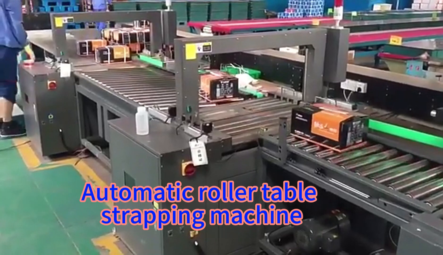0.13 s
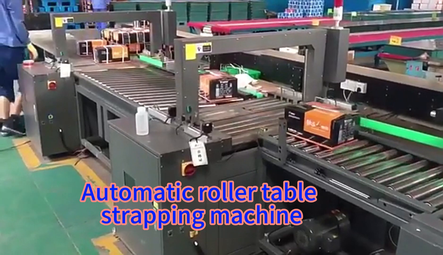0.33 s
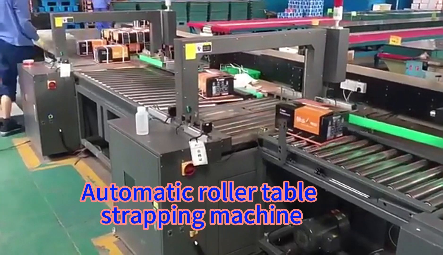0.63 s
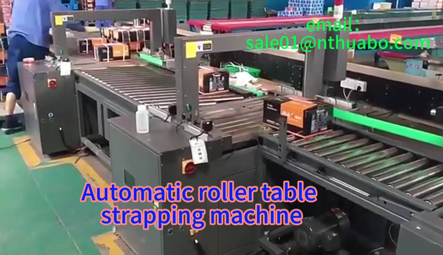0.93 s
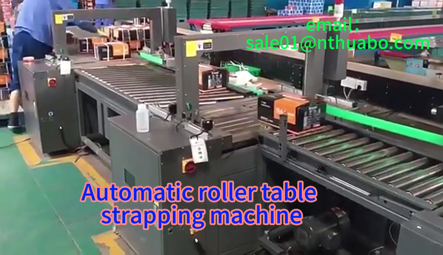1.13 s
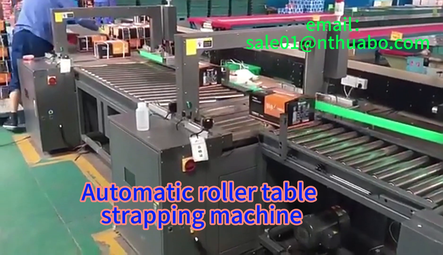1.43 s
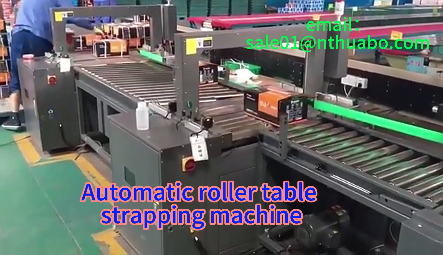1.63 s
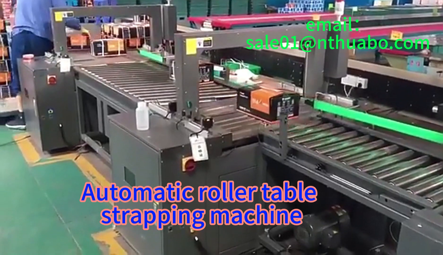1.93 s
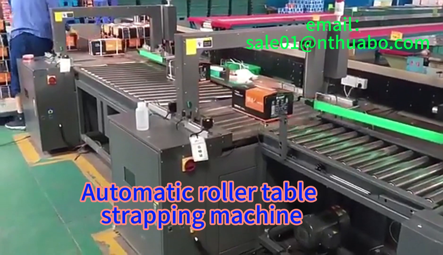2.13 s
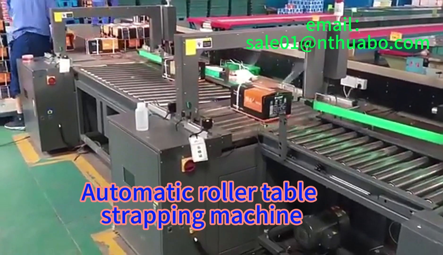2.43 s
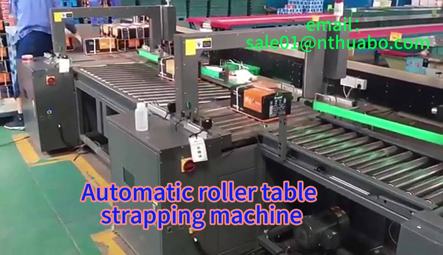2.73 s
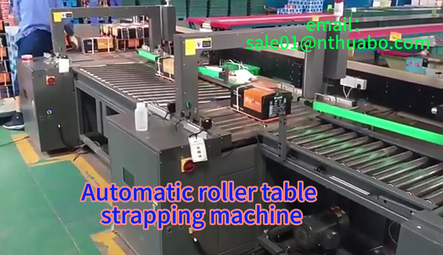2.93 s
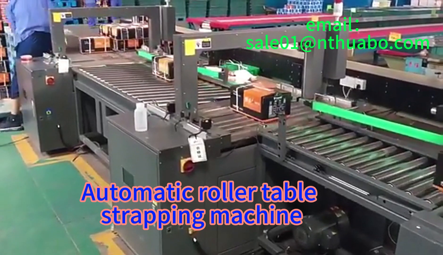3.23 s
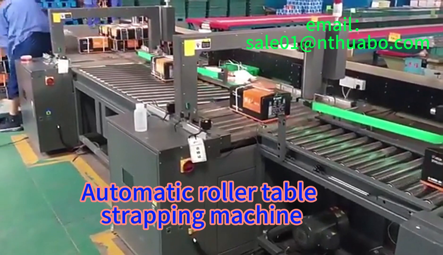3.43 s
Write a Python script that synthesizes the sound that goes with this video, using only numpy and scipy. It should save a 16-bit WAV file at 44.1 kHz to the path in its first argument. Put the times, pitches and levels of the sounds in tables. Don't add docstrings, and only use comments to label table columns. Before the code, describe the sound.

Strapping machine and roller conveyor clanking with hard metal blows over a steady factory roar

```python
import sys
import numpy as np
from scipy import signal
from scipy.fft import rfft, irfft
from scipy.io import wavfile
from scipy.ndimage import uniform_filter1d

SR = 44100
rng = np.random.default_rng(int(sys.argv[2]) if len(sys.argv) > 2 else 0)


def dump_mix(stems):
    frames = np.atleast_2d(stems).T
    limited = np.clip(frames, -1, 1)
    pcm = np.round(limited * 32767).astype(np.int16)
    wavfile.write(sys.argv[1], SR, pcm)


def gain_from_db(level_db):
    decades = np.asarray(level_db, float) / 20
    return 10 ** decades


N = 158319

# time_s, level_db
ROLLER_EFFORT = [(0.0, -33), (0.491, -31.5), (0.581, -33.5), (0.712, -40.5), (1.08, -42.5), (1.2, -53.5),
                 (1.42, -42), (1.82, -48), (2.051, -46.5), (2.18, -35.5), (2.262, -42), (2.42, -40.5),
                 (2.6, -44), (3.28, -45.5), (3.439, -42.5), (3.59, -33.5)]
# frequency_hz, level_db (per Hz)
BLOW_SPECTRUM = [(88, -34), (150, -9.5), (333, 0), (617, -1.5), (1830, -1.5), (2990, -2.5), (3870, -3),
                 (7300, -15), (9490, -48), (16100, -120)]


def evened(x):
    return x / np.sqrt(np.mean(x ** 2) + 1e-20)


def read(points, hz):
    f, value = np.transpose(points)
    return np.interp(np.log(np.minimum(hz, 7000) + 1), np.log(f + 1), value)


def colour(x, points):
    gain = gain_from_db(read(points, np.fft.rfftfreq(len(x), 1 / SR)))
    return evened(irfft(rfft(x) * gain, len(x)))


def track(points):
    s, level_db = np.transpose(points)
    return np.interp(np.arange(N) / SR, s, level_db)


def add(mix, s, sound):
    at = max(round(s * SR), 0)
    part = mix[at:at + len(sound)]
    part += sound[:len(part)]


def resonate(x, hz, width):
    turn = np.exp(2j * np.pi * np.cumsum(hz * np.ones(len(x))) / SR)
    r = np.exp(-np.pi * abs(width) / SR)
    slow = signal.lfilter([1 - r], [1, -r], x / turn + 1e-18)
    return evened((turn * slow).real)


def stroke(t, rise, hold, t60):
    attack = np.sin(np.pi / 2 * np.clip(t / rise, 0, 1)) ** 2
    return attack * gain_from_db(-60 * np.maximum(t - rise - hold, 0) / t60)


def patchy(x, depth_db):
    z = signal.stft(x, nperseg=512, noverlap=384)[2]
    patches = rng.standard_normal(z.shape[::-1]).T
    patches = evened(uniform_filter1d(uniform_filter1d(patches, size=5, axis=0), size=12, axis=1))
    return signal.istft(z * gain_from_db(depth_db * patches), nperseg=512, noverlap=384)[1][:len(x)]


def hall():
    # frequency_hz, level_db (per Hz)
    roar = [(26, -37), (45, -0.5), (151, 1), (242, -8.5), (326, -10), (966, -17), (2220, -24.5),
            (5900, -28.5), (7300, -38.5), (9490, -64), (16100, -120)]
    frames, hz = N // 256 + 5, np.fft.rfftfreq(1024, 1 / SR)
    a, b, patches = rng.standard_normal((frames, 513, 3)).T
    flicker = evened(uniform_filter1d(rng.standard_normal(frames), size=6))
    patches = evened(uniform_filter1d(uniform_filter1d(patches, size=10, axis=0), size=10, axis=1))
    drift_db = 3.8 * np.minimum(hz / 1500, 1)[:, None] * patches + .5 * flicker
    z = (a + 1j * b) * gain_from_db(read(roar, hz)[:, None] + drift_db)
    s, level_db = np.transpose(ROLLER_EFFORT)
    effort_db = np.interp(np.arange(frames) * 256 / SR, s, level_db) + 40.5
    z = z * gain_from_db(.25 * np.minimum(hz / 4000, 1)[:, None] ** 2 * effort_db)
    return gain_from_db(-31) * evened(signal.istft(z, nperseg=1024, noverlap=768)[1][:N])


def table():
    # time_s, level_db
    load = [(0.0, -33), (0.56, -41.5), (0.86, -32), (1.13, -35.5), (1.26, -39), (1.52, -36.5),
            (2.19, -33.5), (2.56, -40.5), (3.32, -35), (3.47, -36), (3.59, -32)]
    # frequency_hz, width_hz, level_db
    panels = [(227, 70, -4), (315, 45, 2), (386, 120, -4)]
    noise = rng.standard_normal(N)
    drone = sum(gain_from_db(db) * resonate(noise, hz, w) for hz, w, db in panels)
    return gain_from_db(track(load) - 3) * evened(drone)


def rollers():
    # frequency_hz, level_db (per Hz)
    rattle = [(120, -39), (200, -17), (360, 6.5), (465, -5.5), (1030, 9), (1240, 4.5), (1880, 6.5),
              (7300, -6.5), (9490, -45), (16100, -120)]
    # frequency_hz, width_hz, level_db
    tubes = [(1122, 15, -12.5), (1880, 55, -1.5), (3240, 93, -6), (5850, 120, -17), (6444, 180, -1),
             (7000, 220, 0)]
    ticks_per_s, spread_db = 2300, 2.5
    ticks = gain_from_db(spread_db * np.minimum(rng.exponential(1, N), 4)) * (rng.random(N) < ticks_per_s / SR)
    hiss = rng.standard_normal(N)
    drive = 0.68 * evened(ticks * rng.choice([-1, 1], N)) + 0.6 * hiss
    rings = sum(gain_from_db(db) * resonate(drive, hz, w) for hz, w, db in tubes)
    shake = gain_from_db(1.6 * evened(uniform_filter1d(rng.standard_normal(N), size=900)))
    return gain_from_db(track(ROLLER_EFFORT) + 0.5) * shake * (colour(drive, rattle) + 0.26 * evened(rings))


def whine(start, length, level_db, from_hz, to_hz):
    u = np.linspace(0, 1, round(length * SR))
    noise = rng.standard_normal(SR // 4)[:len(u)]
    wobble = 1 + 0.007 * evened(uniform_filter1d(noise[::-1], size=500))
    hz = (from_hz + (to_hz - from_hz) * u ** 1.3) * wobble
    octave = gain_from_db(0.42 * level_db + 11.0) * resonate(noise, 2 * hz, 190)
    return start, gain_from_db(level_db) * np.sin(np.pi * u) ** 0.13 * (resonate(noise, hz, 170) + octave)


def thud(start, level_db, hz):
    t = np.arange(0, .2, 1 / SR)
    cycles = np.sin(2 * np.pi * (hz * t + rng.random()))
    return start - .008, gain_from_db(level_db - 9.5) * stroke(t, 0.017, 0.0049, 0.099) * cycles


def tap(start, level_db, hz):
    t = np.arange(0, .12, 1 / SR)
    rise_s = 0.015
    drive = rng.standard_normal(len(t)) * stroke(t, rise_s, 0.003, 0.16)
    sound = colour(drive, BLOW_SPECTRUM) + 0.53 * resonate(drive, hz, 140)
    return start + .004 - rise_s, gain_from_db(level_db - 26) * sound


def ring(start, level_db, hz, t60):
    t = np.arange(0, .2, 1 / SR)
    phase, off = rng.random((2, 6, 1))
    near = np.sin(2 * np.pi * (hz * (1 + 0.13 * (2 * off - 1)) * t + phase))
    bunch = np.sin(2 * np.pi * hz * t) + near.sum(0) / np.sqrt(3)
    return start - .006, gain_from_db(level_db) * stroke(t, .014, .004, t60) * bunch


def contact(start, level_db, hz):
    t = np.arange(0, .03, 1 / SR)
    click = rng.standard_normal(len(t)) * gain_from_db(-60 * t / .012)
    body = np.sin(2 * np.pi * hz * t) * stroke(t, 0.0017, 0.00017, 0.0081)
    return start - .0015, gain_from_db(level_db - 1.5) * (body + signal.lfilter([.5], [1, -.5], click))


def clunk(start, level_db, bright_db, t60):
    t = np.arange(0, .2, 1 / SR)
    rise_s, treble_rise_s, hold_s = 0.019, 0.024, 0.0078
    noise, gate = rng.standard_normal((2, len(t)))
    wide = colour(noise * gain_from_db(1.4 * evened(uniform_filter1d(gate, size=40))), BLOW_SPECTRUM)
    dull = signal.lfilter([1], [1, -.75], wide) * stroke(t - treble_rise_s + rise_s, rise_s, hold_s, t60)
    treble = np.diff(wide, prepend=0) * stroke(t, treble_rise_s, hold_s, t60)
    sound = 0.75 * evened(dull) + gain_from_db(bright_db + 7.0) * evened(treble)
    return start + .006 - treble_rise_s, gain_from_db(level_db - 18.5) * sound


def room(x):
    t60 = 0.38
    taps = np.zeros(SR // 2)
    at = np.arange(400, len(taps) - 20, 20)
    taps[at + rng.integers(0, 20, len(at))] = rng.choice([-1., 1.], len(at))
    taps *= gain_from_db(-60 * np.arange(len(taps)) / SR / t60)
    return signal.fftconvolve(x, taps / np.linalg.norm(taps))[:N]


def scene():
    # start_s, length_s, level_db, from_hz, to_hz
    whines = [
        (1.410, .165, -41, 3650, 3050),
        (1.665, .040, -45, 3700, 3600),
        (2.270, .100, -36, 3430, 3500),
        (3.465, .060, -40, 3950, 3600),
    ]
    # start_s, level_db, pitch_hz
    thuds = [(0.033, -12, 92.6), (0.094, -17, 114.4), (0.151, -19, 106), (0.208, -16.5, 120),
             (0.276, -24, 120), (0.679, -18, 123), (0.789, -18, 225), (0.834, -16.5, 151), (0.87, -11, 124),
             (0.919, -20, 106.3), (0.982, -16, 122), (1.098, -20, 124.3), (1.206, -17, 77),
             (1.397, -22, 108), (1.468, -16.5, 110.5), (1.608, -15, 116), (1.686, -15.5, 94),
             (1.772, -11.5, 93), (1.82, -15.5, 85), (1.858, -16, 99), (2.079, -17, 126.4),
             (2.169, -20.5, 87), (2.281, -20, 105), (2.342, -14, 112), (2.819, -24, 160), (3.171, -32, 95),
             (3.391, -18.5, 135.4), (0.904, -18, 192), (0.945, -28, 243), (1.402, -25, 125),
             (1.621, -17, 109)]
    # start_s, level_db, pitch_hz
    light_taps = [(0.12, -26, 1920), (0.201, -22, 1880), (0.29, -14, 1740), (0.629, -11.5, 2080),
                  (0.914, -14.5, 902), (0.993, -23.5, 930), (1.117, -19, 1590), (1.344, -14, 845),
                  (1.4, -17.5, 930), (1.764, -20, 1660), (1.841, -21.5, 1250), (2.076, -26, 2310),
                  (2.118, -19.5, 1450), (2.145, -33, 1890), (2.518, -27.5, 4000), (2.78, -14.5, 1105),
                  (2.867, -17.5, 1000), (3.029, -21.5, 860), (3.107, -21.5, 990), (3.195, -19, 1850),
                  (3.328, -14.5, 1290)]
    # start_s,
    # level_db, pitch_hz, t60_s
    plates = [(0.484, -32, 2520, 0.097), (0.688, -31, 5890, 0.032), (.694, -39, 2080, 0.034),
              (0.855, -32.5, 313.4, 0.42), (1.272, -29.5, 418.7, 0.12), (1.273, -32, 3350, 0.15),
              (2.085, -42, 2380, 0.3), (2.10, -36.5, 1452, 0.3), (1.28, -39, 1000, 0.45),
              (1.288, -40, 1500, 0.71), (1.576, -34, 1841, 0.12), (1.572, -34, 2800, 0.038),
              (1.588, -29, 725, 0.076), (1.995, -26, 790, 0.077), (1.997, -30.5, 1280, 0.11),
              (2.18, -32, 905, 0.15), (2.181, -34, 4120, 0.065), (2.198, -32, 1930, .09),
              (2.371, -32, 1370, 0.098), (2.374, -35, 5440, 0.072), (2.379, -36.5, 3950, 0.098),
              (3.292, -26, 285, 0.1), (3.295, -31.5, 1830, 0.38), (3.288, -30, 3920, 0.063),
              (3.299, -34, 1210, 0.36), (3.389, -30, 915, 0.062), (3.387, -36, 3890, 0.07),
              (3.571, -31, 3940, 0.045), (3.569, -29, 2800, 0.07)]
    # start_s, level_db, pitch_hz
    contacts = [(0.029, -26, 2130), (0.0473, -23.5, 2000), (0.4633, -20.5, 5900), (0.471, -16.5, 1670),
                (0.4833, -11.5, 2440), (0.4912, -18, 2450), (0.5011, -15.5, 2030), (0.5206, -32, 2130),
                (0.6102, -18.5, 2260), (0.6159, -21, 1250), (0.6317, -24.5, 1780), (0.6396, -23, 2120),
                (0.6925, -23.5, 1870), (0.6994, -12, 2135), (1.2804, -21, 1540), (1.289, -23, 935),
                (1.2937, -22, 940), (1.3004, -20, 3450), (1.31, -22, 880), (1.5812, -15.5, 1830),
                (1.5897, -24, 800), (1.9969, -18.5, 900), (2.0019, -22.5, 845), (2.0076, -15.5, 827),
                (2.0118, -24, 1270), (2.0203, -18.5, 840), (2.1732, -19.0, 1140), (2.1784, -17.4, 1180),
                (2.1886, -15, 1710), (2.2111, -20, 1970), (2.2179, -16, 1870), (2.3735, -20, 1210),
                (2.3807, -22, 1400), (2.3875, -17.5, 1690), (3.293, -18, 1580), (3.299, -17, 1520),
                (3.3054, -12.5, 1840), (3.3117, -25, 1730), (3.3174, -23, 1720), (3.3266, -24, 1300),
                (3.3345, -25, 1810), (3.339, -18.5, 1280), (3.3584, -18, 826), (3.3879, -20, 3160),
                (3.3948, -15.5, 3930), (3.4007, -15, 960), (3.4148, -20.1, 920), (3.5752, -11.5, 4050)]
    # start_s, level_db, bright_db, t60_s
    clunks = [(0.009, -17, -3, 0.073), (0.04, -23.5, -11, 0.056), (0.483, -16, -0.5, 0.096),
              (0.598, -17.5, -0.5, 0.56), (0.695, -15, -6, 0.22), (1.221, -17.5, -10, 0.49),
              (1.277, -10, -11, 0.32), (1.578, -14, -8.5, 0.14), (1.999, -11, -17, 0.22),
              (2.176, -12.5, -12, 0.3), (2.199, -16.5, -22, 0.25), (2.373, -17, 1, 0.071),
              (3.268, -17.5, -9, 0.32), (3.296, -8.5, -9.5, 0.15), (3.388, -14, -2, 0.18),
              (3.573, -14, -2, 0.22)]
    steady = hall() + table() + patchy(rollers(), 3.3)
    hits, near = np.zeros(N), np.zeros(N)
    for mix, source, rows in ((hits, whine, whines), (near, thud, thuds), (hits, tap, light_taps),
                              (near, ring, plates), (hits, contact, contacts), (hits, clunk, clunks)):
        for row in rows:
            add(mix, *source(*row))
    return (steady + near + hits + gain_from_db(-11.5) * room(hits))[None]


def roll_off(x):
    return signal.sosfilt(signal.butter(12, 8820, fs=SR, output="sos"), x)


def record(dry):
    return roll_off(dry)


dry = scene()
out = record(dry)
dump_mix(out)
```